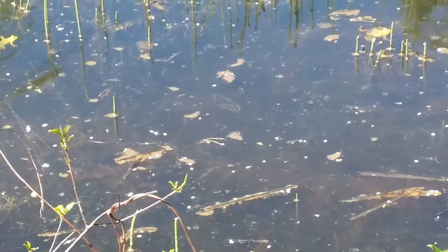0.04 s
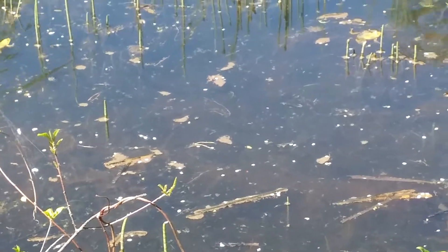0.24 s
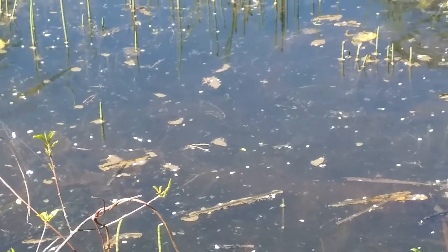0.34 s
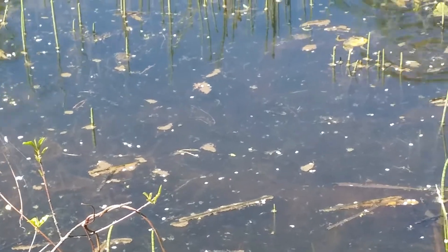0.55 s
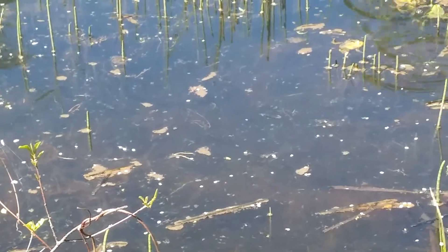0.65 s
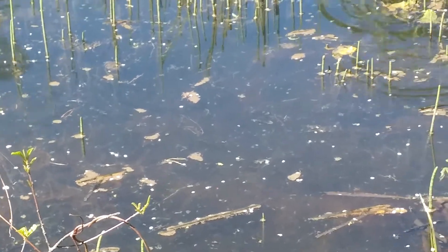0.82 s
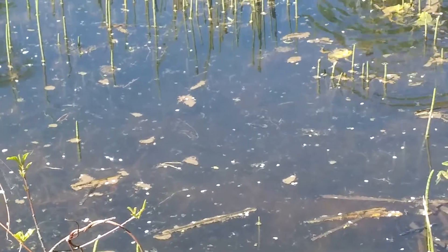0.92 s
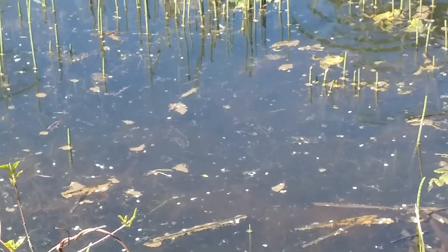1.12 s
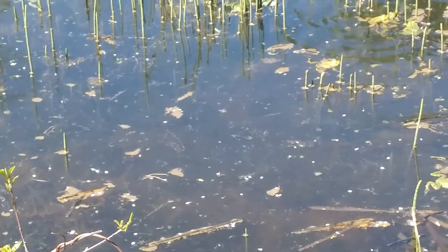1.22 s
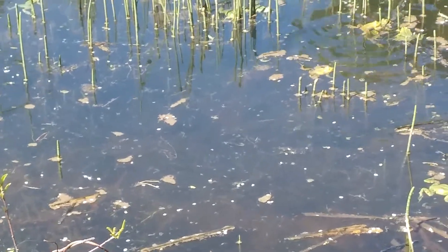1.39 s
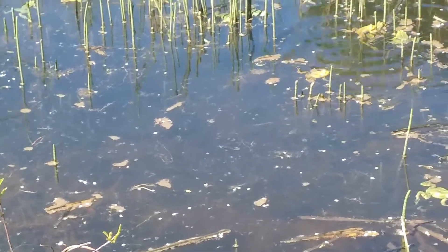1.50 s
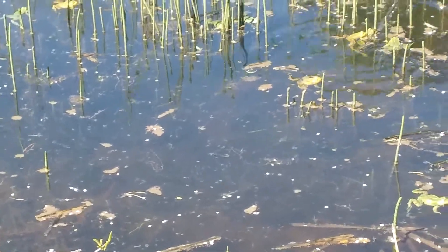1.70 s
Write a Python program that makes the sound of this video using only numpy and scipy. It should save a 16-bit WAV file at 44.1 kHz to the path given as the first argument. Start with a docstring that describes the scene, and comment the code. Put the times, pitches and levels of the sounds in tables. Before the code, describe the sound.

Frogs croak beside a pond over faint hiss and low rumble. The first pulsing croak swells and turns rough, loudest from 0.3 to 0.5 seconds. A quieter second follows at once, with dull microphone bumps around 0.7 seconds, then a third ends near 1 second. After a pause with a few softer bumps, ticks begin around 1.3 seconds and speed into a short rattle at 1.6.

```python
"""Frogs at the edge of a pond, on one microphone, over a faint outdoor hiss and a low rumble.
First a low croak swells and turns rough: each pulse is a snap of the larynx that rings the throat
and the vocal sac. A second croak follows at once, while soft bumps reach the microphone, then a third.
After a pause and a few more bumps, a row of ticks speeds up into a short rattle."""
import sys
import numpy as np
from scipy import signal
from scipy.fft import rfft, irfft
from scipy.io import wavfile
from scipy.ndimage import uniform_filter1d, minimum_filter1d

SR = 44100
rng = np.random.default_rng(int(sys.argv[2]) if len(sys.argv) > 2 else 0)


def dump(signal):
    """Clip the signal to [-1, 1] and save it as 16-bit WAV at the path in sys.argv[1]."""
    limited = np.clip(np.atleast_2d(signal).T, -1, 1)
    pcm = np.round(limited * 32767).astype(np.int16)
    wavfile.write(sys.argv[1], SR, pcm)


N = 77175
T = np.arange(N) / SR

# Colours of the background at the pond. Each row: frequency in Hz, relative power per Hz in dB.
RUMBLE_COLOUR = [(20, -37), (35, -31), (55, -1), (90, -0.5), (140, -3.5), (220, -6), (350, -14), (700, -25),
                 (2000, -78.5)]
HISS_COLOUR = [(25, -29.5), (120, 1), (350, -7), (520, -5), (900, -6), (2000, -14), (3500, -13.5),
               (5000, -13.5), (6300, -19.5), (7600, -32.5), (11000, -35.5), (15500, -47.5)]
RUSTLE_COLOUR = [(20, -79.5), (6500, -11.5), (8500, -3.5), (9700, 0.5), (11500, -15.5), (15500, -9.5)]
# How rumble and rustle rise and fall. Each row: time in seconds, level in dB.
RUMBLE_LEVELS = [(0, -61.5), (.25, -46.5), (.31, -41), (.39, -44.5), (.45, -35.5), (.5, -44), (.6, -43),
                 (.67, -39.5), (.705, -21.5), (.745, -28), (.81, -40.5), (.92, -51.5), (1.03, -39),
                 (1.08, -55), (1.2, -46), (1.25, -46), (1.42, -46), (1.53, -47.5), (1.585, -34.5),
                 (1.64, -45.5), (1.75, -54)]
RUSTLE_LEVELS = [(0, -101), (.44, -96.5), (.5, -71), (.58, -85), (.87, -74.5), (1.05, -83), (1.6, -82),
                 (1.72, -63), (1.75, -71)]
# Bumps on the microphone. Each row: centre in seconds, peak in dB, pitch in Hz, half-width in seconds.
MIC_BUMPS = [(0.605, -19.5, 186, 0.0019), (0.632, -21.5, 167, 0.004), (.6935, -17, 160, 0.0064),
             (0.714, -13, 127, 0.0091), (0.7318, -8, 253, 0.0021), (0.754, -20.5, 127, 0.018),
             (1.031, -25.5, 170, 0.0033), (1.229, -28, 224, 0.001), (1.248, -29, 261, 0.004),
             (1.289, -28, 187, 0.0025)]
# Scatter from reeds and banks. Each row: seconds to fall 60 dB, level against the direct sound in dB.
BANK_ECHOES = [(0.026, -4.5), (0.349, -20.5)]
# Thin overtones on the calls. Each row: start and end in seconds, first and last pitch in Hz, level in dB.
OVERTONES = [(.283, .515, 4260, 4170, -33.5), (0.63, 0.755, 3950, 3650, -48),
             (0.887, .975, 5850, 4600, -65), (1.555, 1.64, 6150, 5850, -64.5)]
# Colour of the rasp of air after a pulse. Each row: frequency in Hz, relative power per Hz in dB.
RASP_COLOUR = [(1200, -8), (2100, 20), (2550, -5), (3000, 1.5), (3600, 0.5), (4300, -5.5), (4800, -16.5),
               (6500, -33), (8000, -56.5)]
# Single ticks. Each row: start in seconds, level in dB, throat ring in Hz, sac against throat in dB.
TICK_PULSES = [(.7646, -37, 1780, -3), (1.0129, -42, 1420, -1), (1.272, -62, 1200, 8),
               (1.309, -61, 1200, 11), (1.3526, -49.5, 1090, 6.5), (1.3961, -46.5, 1060, 5),
               (1.4437, -47.5, 1110, 6), (1.48, -43.5, 1110, 4), (1.5171, -40.5, 1230, 1.5),
               (1.5442, -38.5, 1330, 1), (1.5642, -36.5, 1270, -2), (1.5751, -36, 1300, 1),
               (1.5872, -33, 1350, -4), (1.5962, -34, 1340, -2), (1.6035, -37, 1550, -2),
               (1.6131, -30, 1620, -11), (1.6246, -32, 1600, -10), (1.6397, -41, 1690, -2)]
# The vocal sac tightens as the ticks speed up. Each row: time in seconds, sac ring in Hz.
TICK_SAC_PITCH = [(1.35, 540), (1.55, 616)]
# Pushes of air that lift a few pulses of a croak. Each row: time in seconds, lift in dB.
AIR_PUSHES = [(.138, 8), (.169, 9), (.196, 7), (.2295, 3), (.41, 2), (.4405, 3), (.4865, 3), (.879, 6),
              (.909, 10), (.9355, 10), (.962, 4.5), (.9925, 7)]
# One table per croak. Each row: time in seconds, pulses per second, throat ring in Hz, throat level
# in dB, sac against throat in dB, snap against ring in dB, roughness from 0 to 1.
CROAKS = [
    [(.015, 185, 1000, -56, -3, 2, .25), (.13, 190, 1060, -48.5, -5, 3, .25),
     (.205, 172, 1250, -39, -7, 6, .2), (.235, 255, 1280, -27.5, -11, 6, .1),
     (.265, 312, 1550, -26, -17, -5, .12), (.295, 350, 1716, -22.5, -17, -17, 0.05),
     (.322, 355, 1753, -17.5, -4.5, -22, 0.04), (.342, 285, 1825, -15.5, -19, -14.5, 0.17),
     (.37, 240, 1744, -15.5, -15.5, -32, 0.4), (.415, 230, 1586, -15.5, -8, -16.5, 0.4),
     (.436, 255, 1486, -20, -21, -11, 0.6), (.451, 252, 1574, -8.5, -10.5, -17, 0.44),
     (.474, 250, 1600, -22, -4, -7, .8), (.503, 185, 1804, -24.5, -10, -3.5, 0.24),
     (.531, 160, 1868, -33, -6, 3, 0.34)],
    [(.534, 188.5, 1150, -46.5, 0.5, 12, 0.35), (.59, 245, 1230, -35, -10.5, -8.5, 0.25),
     (.63, 200, 1350, -35, -4, -15, .45), (.67, 215, 1530, -30, -13, -17, .7),
     (.715, 198, 1514, -29.5, -8.5, -25, 0.78), (.752, 116, 1550, -30.5, -10, 0, 0.3)],
    [(.772, 235, 750, -47, -0.5, -1, 0.44), (.85, 205, 810, -44, -5, -6, 0.38),
     (.9, 190, 970, -43, 0, -9, 0.34), (.955, 195, 1130, -38, -12.5, -14, 0.03),
     (.976, 220, 1290, -26.5, -10, -28, 0.03), (.988, 170, 1270, -41, 1.5, -16, 0.02),
     (1.003, 129, 1420, -45, 6, -14, 0.26)],
]

SAC_HZ, SAC_WIDTH_HZ, RING_WIDTH_HZ = 530, 145, 175
SNAP_HZ, SNAP_WIDTH_HZ, TREBLE_HZ, TREBLE_WIDTH_HZ = 1220, 950, 3400, 1700
LOW_EDGE_HZ, BODY_EDGE_HZ, TREBLE_EDGE_HZ = 450, 2120, 4350
LEAD_S, SAC_LAG_S, TREBLE_LAG_S = .005, .001, .003  # throat first, then the sac, the top treble last
JITTER_S, SHIMMER_DB, RING_SCATTER, SAC_SCATTER = .0014, 3.5, .17, .093  # at full roughness


def amp(db):
    """Decibels to gain."""
    return 10 ** (np.asarray(db) / 20)


def unit_rms(x):
    """Scales to rms 1."""
    return x / np.sqrt(np.mean(x ** 2) + 1e-30)


def follow(table, t):
    """Every column of a curve table at the times t."""
    times, *columns = np.transpose(table)
    return [np.interp(t, times, column) for column in columns]


def add(mix, start_s, sound):
    """Adds a sound into the mix, row for row."""
    part = mix[:, max(round(start_s * SR), 0):][:, :sound.shape[1]]
    part += sound[:, :part.shape[1]]


def noise(colour, envelope=1):
    """White noise under an envelope, then coloured with its power kept."""
    hz, db = np.transpose(colour)
    gain = amp(np.interp(np.log(np.fft.rfftfreq(N, 1 / SR) + 1), np.log(hz), db))
    return irfft(rfft(envelope * rng.standard_normal(N)) * unit_rms(gain), N)


def roll_off(ratio, order):
    """Power passed by a steep filter edge."""
    return 1 / (1 + ratio ** order)


def resonance(f, hz, width_hz, edges):
    """Power spectrum of one resonance between filter edges, with energy 1."""
    power = edges / ((f ** 2 - hz ** 2) ** 2 + (f * width_hz) ** 2)
    return power / power.mean()


def background(hiss_db=-52.5):
    """The open air around the microphone: uneven low rumble, steady hiss and a faint high rustle."""
    rumble = noise(RUMBLE_COLOUR) * amp(follow(RUMBLE_LEVELS, T)[0])
    hiss = noise(HISS_COLOUR) * amp(hiss_db)
    rustle = noise(RUSTLE_COLOUR) * amp(follow(RUSTLE_LEVELS, T)[0])
    return rumble + hiss + rustle


def mic_bumps():
    """Dull pushes right on the microphone, a few cycles long at most."""
    return sum(amp(db) * np.exp(-((T - at) / width) ** 2) * np.cos(2 * np.pi * hz * (T - at))
               for at, db, hz, width in MIC_BUMPS)


def banks(direct):
    """The direct sound, then a quick scatter and a faint tail from the reeds and banks farther off."""
    t = T[:SR // 2]
    response = np.zeros(len(t))
    for t60, db in BANK_ECHOES:
        tail = rng.standard_normal(len(t)) * amp(-60 * t / t60)
        response += amp(db) * tail / np.linalg.norm(tail)
    return direct + signal.fftconvolve(direct, response)[:N]


def overtones(width_hz=130):
    """A thin, fuzzy whistle on top of each call that swells and fades as its pitch sinks."""
    out = np.zeros(N)
    smooth = signal.butter(2, width_hz / 2, fs=SR, output="sos")
    for start, end, from_hz, to_hz, db in OVERTONES:
        progress = np.clip((T - start) / (end - start), 0, 1)
        hz = from_hz + (to_hz - from_hz) * progress
        fuzz = signal.sosfilt(smooth, rng.standard_normal(N) + 1j * rng.standard_normal(N))
        tone = (fuzz * np.exp(2j * np.pi * np.cumsum(hz) / SR)).real
        out += amp(db) * np.sin(np.pi * progress) * unit_rms(tone)
    return out


def larynx_pulse(ring_hz, sac_hz, sac_db, snap_db, rough, size=2048):
    """One snap of the larynx, LEAD_S in, rings throat and sac. Two rows: sound, envelope of its rasp."""
    f = np.fft.rfftfreq(size, 1 / SR) + 1
    low_cut = roll_off(LOW_EDGE_HZ / f, order=12)
    body_band = low_cut * roll_off(f / BODY_EDGE_HZ, order=26)
    ring = resonance(f, ring_hz, RING_WIDTH_HZ, body_band * roll_off(SAC_HZ / f, order=4))
    snap = resonance(f, SNAP_HZ, SNAP_WIDTH_HZ, body_band)
    sac = resonance(f, sac_hz, SAC_WIDTH_HZ, body_band)
    treble = resonance(f, TREBLE_HZ, TREBLE_WIDTH_HZ, low_cut * roll_off(f / TREBLE_EDGE_HZ, order=40))
    snap_weight = amp(snap_db) ** 2
    throat = (ring + snap_weight * snap) / (1 + snap_weight)
    power = throat + amp(sac_db) ** 2 * sac + amp(-14) ** 2 * rough * treble
    # Minimum phase: a sharp onset, then the ringing.
    log_gain = np.log(power + 1e-11) / 2
    mirrored = np.concatenate([log_gain, log_gain[-2:0:-1]])
    spectrum = np.exp(np.conj(signal.hilbert(mirrored)))[:len(f)]
    delay = LEAD_S + SAC_LAG_S * roll_off(f / (2 * SAC_HZ), order=4)
    delay += TREBLE_LAG_S * roll_off(TREBLE_EDGE_HZ / f, order=6)
    sound = irfft(spectrum * np.exp(-2j * np.pi * np.cumsum(delay) * SR / size))
    t = np.arange(size) / SR - LEAD_S
    puff = (t > 0) * np.exp(-t / .004)  # the air dies away in a few milliseconds
    return np.array([sound, np.sqrt(rough) * puff / np.linalg.norm(puff)])


def ticks(span_s=.008):
    """Larynx pulses heard one by one, then as a rattle; each has the energy of its level over span_s."""
    out = np.zeros((2, N))
    for start, db, ring_hz, sac_db in TICK_PULSES:
        sac_hz = follow(TICK_SAC_PITCH, start)[0]
        pulse = larynx_pulse(ring_hz, sac_hz, sac_db, snap_db=sac_db - 4, rough=.49)
        add(out, start - LEAD_S, amp(db) * np.sqrt(SR * span_s) * pulse)
    return out


def croak(voice, push_s=.011, max_pulses=256):
    """A train of pulses in step with each push of air; roughness unsettles timing, strength and ring."""
    out = np.zeros((2, N))
    chance = rng.standard_normal((max_pulses, 4)).clip(-2, 2)
    t = np.arange(voice[0][0], voice[-1][0], 1 / SR)
    cycles = np.cumsum(follow(voice, t)[0]) / SR
    # Bend the count of cycles so that a pulse is due on every push.
    pushes = [t[0]] + [at for at, lift in AIR_PUSHES if t[0] < at < t[-1]]
    due = np.interp(pushes, t, cycles)
    count = np.floor(cycles + np.interp(t, pushes, np.round(due) - due))
    starts = t[np.diff(count, prepend=0) > 0]
    for start, (jitter, shimmer, ring_drift, sac_drift) in zip(starts, chance):
        rate, ring_hz, db, sac_db, snap_db, rough = follow(voice, start)
        db += sum(lift * np.exp(-((start - at) / push_s) ** 2)
                  for at, lift in AIR_PUSHES if start > at - .5 / rate)
        db += SHIMMER_DB * rough * shimmer
        ring_hz *= 1 + RING_SCATTER * rough * ring_drift
        sac_hz = SAC_HZ * (1 + SAC_SCATTER * rough * sac_drift)
        pulse = larynx_pulse(ring_hz, sac_hz, sac_db, snap_db, rough)
        add(out, start - LEAD_S + JITTER_S * rough * jitter, amp(db) * np.sqrt(SR / rate) * pulse)
    return out


def scene():
    """Frogs, bumps and background at one microphone by the water."""
    pulses, puffs = sum(croak(voice) for voice in CROAKS) + ticks()
    rasp = amp(-16) * noise(RASP_COLOUR, envelope=puffs)
    frogs = pulses + rasp + overtones()
    return (banks(frogs) + mic_bumps() + background())[None]


def record(dry, bass_cut_hz=38, ceiling_db=-.3, hold_s=.004, top_hz=15650):
    """Behind the microphone: a bass cut, a smooth peak limiter and the band limit."""
    x = signal.sosfilt(signal.butter(2, bass_cut_hz, "high", fs=SR, output="sos"), dry)
    hold = int(hold_s * SR)
    gain = minimum_filter1d(np.minimum(1, amp(ceiling_db) / (abs(x) + 1e-9)), 2 * hold)
    limited = x * uniform_filter1d(uniform_filter1d(gain, hold), hold)
    low_pass = signal.firwin(511, top_hz, window=("kaiser", 9), fs=SR)
    return signal.oaconvolve(limited, low_pass[None], "same")


dry = scene()
out = record(dry)
dump(out)
```